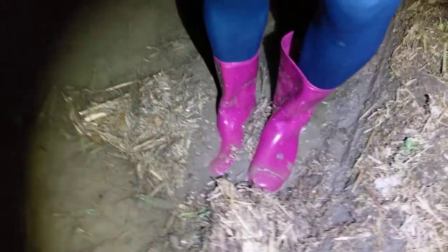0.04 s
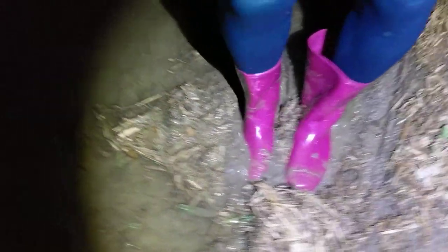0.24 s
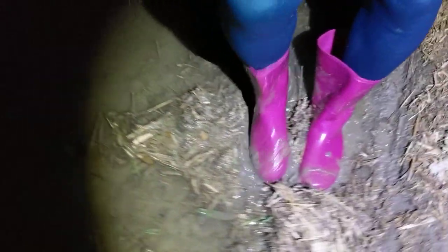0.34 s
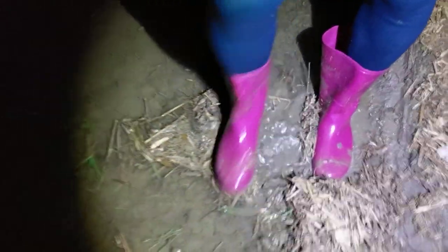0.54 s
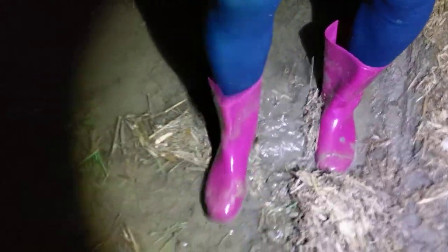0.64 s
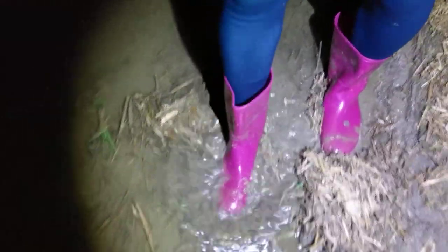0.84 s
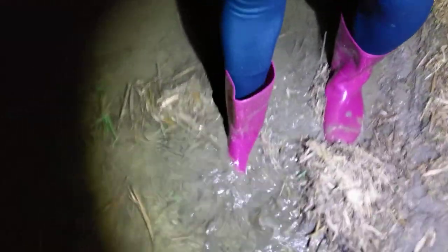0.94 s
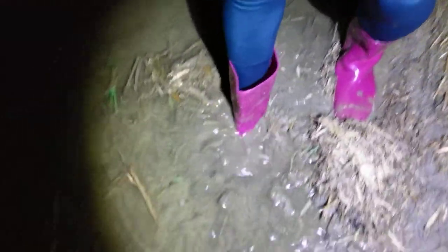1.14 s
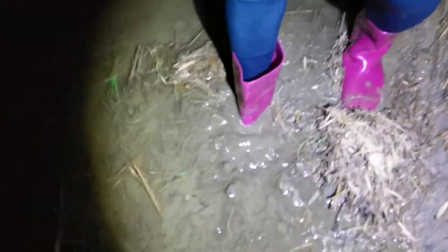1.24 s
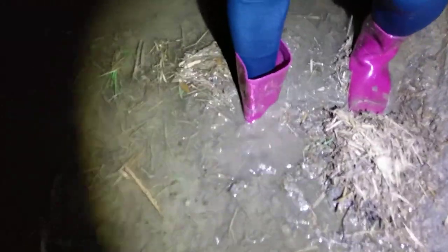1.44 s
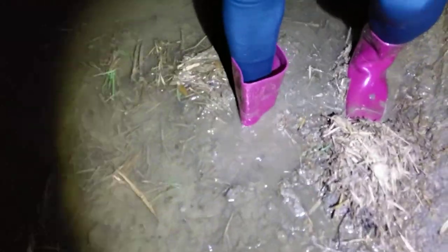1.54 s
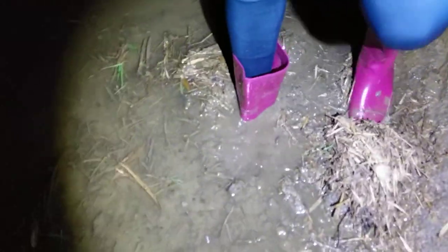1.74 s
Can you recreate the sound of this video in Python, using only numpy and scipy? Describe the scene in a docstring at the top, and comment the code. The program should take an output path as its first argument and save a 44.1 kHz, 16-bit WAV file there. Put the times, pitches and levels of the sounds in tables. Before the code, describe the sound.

A rubber boot squelches out of thick mud in two sharp wet bursts with popping bubbles, then a small rising plop, near quiet, and a last wet dribble; close stereo outdoors, slightly right, katydid buzzing left.

```python
"""Outdoors at night, a rubber boot pulls out of thick mud and steps into shallow muddy water.
A low rumble and insect hiss (coloured noise) and a katydid high up on the left (falling chirps) run throughout.
Dribbling and a small bubble lead into a cluster of squelches: noise clicks as thud, air pocket and spray.
Further wet tears follow with popping bubbles (damped rings), and near 0.8 s a cavity closes in a rising plop.
A faint tear follows at about 1 s, and a last few tears, bubbles and drops after 1.6 s."""
import sys
import numpy as np
from scipy import signal
from scipy.fft import rfft, irfft, next_fast_len
from scipy.io import wavfile
from scipy.ndimage import map_coordinates

SR = 44100
rng = np.random.default_rng(int(sys.argv[2]) if len(sys.argv) > 2 else 0)


def bounce(signal):
    """Save signal as a 16-bit WAV file at the path given by the first command-line argument."""
    frames = np.transpose(np.atleast_2d(signal))
    limited = np.clip(frames, -1, 1)
    pcm = np.round(limited * 32767).astype(np.int16)
    wavfile.write(sys.argv[1], SR, pcm)


N = 79380


def undb(db):
    """Decibels to an amplitude factor."""
    return 10 ** (np.asarray(db) / 20)


def unit(x):
    """Scale to an RMS of one."""
    return x / np.sqrt(np.mean(x ** 2))


def along(points, hz):
    """Read a table on a log-frequency axis."""
    point_hz, values = np.array(points, float).T
    return np.interp(np.log(hz + 1), np.log(point_hz), values)


def colour(x, points):
    """Causal minimum-phase filter with the given (Hz, dB) response, made by folding its cepstrum."""
    size = 2 * next_fast_len(len(x), real=True)
    hz = np.arange(size // 2 + 1) * SR / size
    cepstrum = irfft(np.log(undb(along(points, hz))))
    cepstrum[1:size // 2] *= 2
    cepstrum[size // 2 + 1:] = 0
    response = np.exp(rfft(cepstrum))
    return irfft(rfft(x, size) * response)[:len(x)]


def band(x, hz, octaves, order=4):
    """A broad resonance with steep sides."""
    edges = hz * 2 ** (np.array([-.5, .5]) * octaves)
    return signal.sosfilt(signal.butter(order, edges, "band", fs=SR, output="sos"), x)


def add(out, start_s, x):
    """Mix a short sound in at its time."""
    i = int(start_s * SR)
    out[i:i + len(x)] += x[:max(len(out) - i, 0)]


def scatter(x, decay_s):
    """Many faint reflections from grass and earth: a noise tail that swells briefly and dies away."""
    t = np.arange(SR // 4) / SR
    swell = 1 - np.exp(-t / 0.0022)
    tail = rng.standard_normal(len(t)) * np.exp(-t / decay_s) * swell
    return signal.fftconvolve(x, tail / np.linalg.norm(tail))[:N]


def bubble(hz, decay_cycles):
    """A damped ring with a quick onset, whose pitch rises a little."""
    rise = .04  # share of the starting pitch per decay time
    age = np.arange(int(6 * decay_cycles / hz * SR)) * hz / SR / decay_cycles  # in decay times
    ring = np.sin(2 * np.pi * decay_cycles * age * (1 + rise * age / 2))
    return ring * np.exp(-age) * (1 - np.exp(-8 * age))


def night():
    """Noise as a far rumble, alike in both ears at low pitch, plus separate hiss of far insects per ear."""
    # Rumble spectrum: pitch_hz [Hz], level_db [dB]
    rumble_colour = [(13, -29), (22, -13.5), (53, 1.5), (107, -2.5), (218, -11), (241, -16), (385, -14.5),
                     (615, -20.5), (713, -22), (2220, -29.5), (2910, -28.5), (3370, -30.5), (4320, -24),
                     (7070, -38.5), (8000, -43.5), (10400, -76), (17600, -120)]
    # Likeness of left and right in the rumble: pitch_hz [Hz], likeness [0-1]
    ear_likeness = [(40, 0.77), (250, 0.66), (1000, 0.14), (3000, 0)]
    # Spectrum of far insects and hiss: pitch_hz [Hz], level_db [dB]
    insect_colour = [(6500, -26), (8400, -10.5), (9300, -5), (10400, -9), (12500, -2.5), (14200, -14),
                     (16000, -11.5)]
    rumble_db, insects_db = -61, -65
    alike = np.clip(along(ear_likeness, np.arange(N // 2 + 1) * SR / N), 0, 1)
    width = np.sqrt((1 - alike) / (1 + alike))
    mid = colour(rng.standard_normal(N), rumble_colour)
    side = irfft(rfft(colour(rng.standard_normal(N), rumble_colour)) * width, N)
    rumble = undb(rumble_db) * np.array([mid + side, mid - side]) / np.std(mid)
    hiss = np.array([unit(colour(rng.standard_normal(N), insect_colour)) for _ in range(2)])
    return rumble + undb(insects_db) * hiss


def katydid():
    """Each wing stroke is a short falling chirp; the grass smears the train into a buzz."""
    # One wing stroke: time_s [s], pitch_hz [Hz], level_db [dB, relative]
    stroke = [(0, 14500, -18), (.0009, 12340, 2.5), (.0016, 10900, -3.5), (.002, 10200, -9.5),
              (.0026, 9500, -4.5), (.0034, 9340, -1.5), (.0048, 9150, -9)]
    # Wing rate over the scene: time_s [s], rate [strokes per s]
    wing_rate = [(0, 93.3), (.3, 92.88), (1.05, 92.85), (1.3, 93.42)]
    first_stroke_s, level_db, right_db = .0034, -45.5, -22.5  # right is relative to left
    scatter_db, scatter_decay_s = -8.5, 0.0066
    late_s, force_db, detune = .00002, 0.53, .006  # spread from stroke to stroke; detune is a share
    out = np.zeros(N)
    point_s, point_hz, point_db = np.array(stroke).T
    t, clock = np.arange(int(point_s[-1] * SR)) / SR, np.arange(N) / SR
    turns = np.cumsum(np.interp(t, point_s, point_hz)) / SR
    size = undb(np.interp(t, point_s, point_db))
    beats = np.cumsum(np.interp(clock, *np.array(wing_rate).T)) / SR
    starts = first_stroke_s + np.interp(np.arange(int(beats[-1]) + 1), beats, clock)
    for start_s, (late, pitch, force) in zip(starts, rng.standard_normal((len(starts), 3))):
        chirp = size * np.sin(2 * np.pi * turns * (1 + detune * pitch))
        add(out, start_s + late_s * late, undb(level_db + force_db * force) * chirp)
    ears = np.array([out + undb(scatter_db) * scatter(out, scatter_decay_s) for _ in range(2)])
    return ears * undb([[0], [right_db]])


def dribbles():
    """Tiny drops and bubbles of mud and water, damped rings at random pitches, trickle and fade."""
    # Trickles: start_s [s], end_s [s], rate [drops per s], level_db [dB, smallest drop at the start]
    trickles = [(0.121, 0.208, 300, -62), (0.282, 0.504, 750, -54), (0.702, 0.923, 230, -54.5),
                (1.665, 1.8, 650, -53.5)]
    low_hz, high_hz, decay_cycles = 987, 7300, 2.3
    spread_db, fade_db = 7, 11  # louder for the biggest drops; quieter by the end
    out = np.zeros(N)
    for start_s, end_s, rate, level_db in trickles:
        length_s = end_s - start_s
        for when, pitch, size in rng.random((int(rate * length_s), 3)):
            hz = low_hz * (high_hz / low_hz) ** pitch
            drop_db = level_db + spread_db * size ** 2 - fade_db * when
            add(out, start_s + when * length_s, undb(drop_db) * bubble(hz, decay_cycles))
    return out


def bubbles():
    """Single bubbles pop in the wet mud, each a damped ring."""
    # Pops: start_s [s], pitch_hz [Hz, at the start], level_db [dB, before the envelope], decay [cycles]
    pops = [ (.164, 900, -49.5, 2.1), (0.241, 1390, -21.5, 3), (0.2413, 1140, -20.5, 2),
            (.2495, 1010, -18.5, 1.6), (.2865, 1140, -34.5, 1.5), (.305, 1120, -42, 3),
            (.4165, 680, -52, 0.84), (.437, 985, -49.5, 2.6), (.4372, 5200, -39, 3.3),
            (.4515, 5800, -41, 3.2), (0.463, 880, -44.5, 1.2), (.4755, 5800, -40, 4.5),
            (0.4966, 5700, -35.5, 2.9), (.511, 2070, -44, 6), (.5252, 2200, -45, 5.9),
            (.6012, 9100, -21.5, 3.1), (0.6074, 1790, -28.5, 2), (.6138, 7340, -41, 4),
            (.631, 1720, -34, 0.92), (.634, 1780, -42, 2), (.6655, 370, -44, 1.7), (.674, 1730, -31, 3.3),
            (0.6823, 3000, -21, 1.46), (0.689, 2920, -34, 3), (0.7532, 1570, -41.5, 2.3),
            (0.766, 4400, -44, 4), (0.781, 4380, -37, 7.1), (0.801, 1520, -46.5, 5.3), (.8105, 703, -37, 5),
            (.8122, 4780, -24, 2.3), (0.852, 6900, -36.5, 4.1), (1.651, 2030, -36, 3.5),
            (1.6511, 720, -50, 1.9), (1.678, 4570, -36, 3.3), (1.707, 5540, -38, 9)]
    out = np.zeros(N)
    for start_s, pitch_hz, level_db, decay_cycles in pops:
        add(out, start_s, undb(level_db) * bubble(pitch_hz, decay_cycles))
    return out


def plop():
    """The cavity behind the boot rings, and its pitch shoots up as it closes."""
    start_s, length_s, attack_s = .8102, 0.032, 0.00082
    start_hz, end_hz, bend = 1045, 2540, 3.97  # a higher bend keeps the rise for the end
    hit_db, hit_decay_s = -27.5, 0.0036
    ring_db, ring_decay_s = -40.5, 0.078
    out, t = np.zeros(N), np.arange(int(length_s * SR)) / SR
    closed = t / length_s
    hz = start_hz + (end_hz - start_hz) * closed ** bend
    size = undb(hit_db) * np.exp(-t / hit_decay_s) + undb(ring_db) * np.exp(-t / ring_decay_s)
    size *= np.minimum(t / attack_s, 1) * (1 - closed ** 20)  # soft onset, late cut-off
    add(out, start_s, size * np.sin(2 * np.pi * np.cumsum(hz) / SR))
    return out


def squelches():
    """Mud tears in dense clicks that thump the boot, ring the trapped air and throw spray."""
    # Tears: start_s [s], hold_s [s], decay_s [s], thud_db [dB], pocket_hz [Hz, air pocket],
    # pocket_db [dB], spray_db [dB], spray_top_hz [Hz]; all levels are scaled by the push
    tears = [ (0.2353, 0.00064, 0.0026, -46.5, 2000, -40, -30.5, 14900),
             (0.2381, 0.0043, 0.0011, -43, 1620, -27, -29.5, 15000),
             (0.2444, 0.0028, .002, -77, 1495, -31.5, -36, 12000),
             (.2480, 0.0027, 0.00095, -48, 1470, -26.5, -34, 12000),
             (0.2544, 0.011, 0.008, -48, 1680, -42.5, -50.5, 9050),
             (0.274, .016, 0.0055, -52, 1240, -52, -66, 7000),
             (0.298, 0.01, 0.0059, -58, 1170, -56.5, -56.5, 6940),
             (.416, 0.0035, 0.0096, -60.5, 1477, -60, -53.5, 5930),
             (.436, 0.02, .005, -72, 1220, -66, -54, 8000),
             (0.5965, 0.019, 0.005, -73, 2150, -52.5, -46.5, 15900),
             (.624, .011, 0.0025, -70, 1890, -52, -58, 13000),
             (0.6639, .002, 0.0013, -46, 2950, -30, -29, 15000),
             (0.6669, 0.0042, 0.0018, -48, 2700, -32.5, -29.5, 14800),
             (.6730, .002, 0.00074, -42.5, 2420, -27, -25, 16200),
             (0.6783, 0.0049, 0.0034, -62, 2780, -52, -42, 14100),
             (0.686, 0.0018, 0.0068, -69, 2890, -45.5, -44, 10900),
             (.727, 0.0016, 0.0026, -49.5, 1200, -69, -71, 6000),
             (0.746, 0.039, 0.022, -78, 2460, -58, -54.5, 6050),
             (0.809, .0015, 0.00091, -63, 2250, -34.5, -37.5, 15500),
             (0.812, 0.024, 0.0099, -70, 1910, -55.5, -67, 7000),
             (1.055, 0.0033, 0.0094, -54, 1210, -57.5, -68, 3960),
             (1.648, 0.0031, 0.0065, -56, 1830, -47.5, -49, 7000),
             (1.665, 0.026, 0.02, -61.5, 1280, -57, -52, 5200)]
    # Spray colour: pitch_hz [Hz], level_db [dB]
    spray_colour = [(1800, -31), (3500, -8.5), (5000, 2.5), (6300, 2), (7800, -3), (9500, -0.5),
                    (13000, -4), (16000, -6)]
    thud_hz, thud_octaves, pocket_octaves = 222, 2.59, 1.31
    grain_db, grain_db_per_s = 2.5, 70  # slow tears break into more uneven clicks
    out, t = np.zeros(N), np.arange(SR // 6) / SR
    for start_s, hold_s, decay_s, thud_db, pocket_hz, pocket_db, spray_db, spray_top_hz in tears:
        push = np.exp(-np.maximum(t - hold_s, 0) / decay_s)
        unevenness_db = (grain_db + grain_db_per_s * hold_s) * rng.exponential(size=(3, len(t)))
        clicks = push * rng.standard_normal((3, len(t))) * undb(unevenness_db)
        thud = undb(thud_db) * unit(band(clicks[0], thud_hz, thud_octaves, order=2))
        pocket = undb(pocket_db) * unit(band(clicks[1], pocket_hz, pocket_octaves))
        soften = signal.butter(3, spray_top_hz, fs=SR, output="sos")
        spray = undb(spray_db) * unit(signal.sosfilt(soften, colour(clicks[2], spray_colour)))
        add(out, start_s, (thud + pocket + spray) * np.sqrt(np.mean(push ** 2)))
    return out


def scene():
    """The boot is nearer the right microphone; the bank returns a faint tail."""
    # Shading of the left microphone for sounds from the ground: pitch_hz [Hz], level_db [dB]
    left_shade = [(150, -2.5), (500, -2), (1100, -5), (2800, -5.5), (7000, -9), (14000, -11)]
    left_lag_s, bank_db, bank_decay_s = .000078, -20, 0.024
    boot = dribbles() + bubbles() + plop() + squelches()
    left = map_coordinates(colour(boot, left_shade), [np.arange(N) - left_lag_s * SR])
    bank = np.array([scatter(boot, bank_decay_s) for _ in range(2)])
    return night() + katydid() + np.array([left, boot]) + undb(bank_db) * bank


def record(dry):
    """The recorder cuts the top steeply above 16 kHz."""
    return signal.sosfilt(signal.ellip(10, .2, 70, 16000, fs=SR, output="sos"), dry)


dry = scene()
out = record(dry)
bounce(out)
```